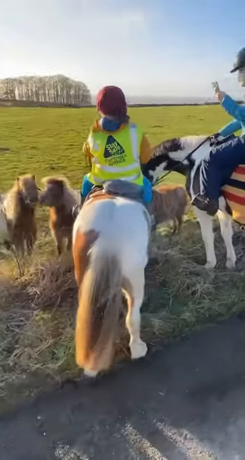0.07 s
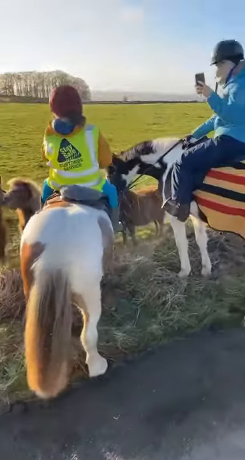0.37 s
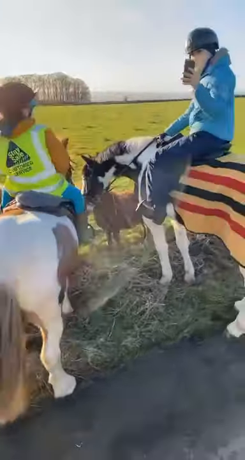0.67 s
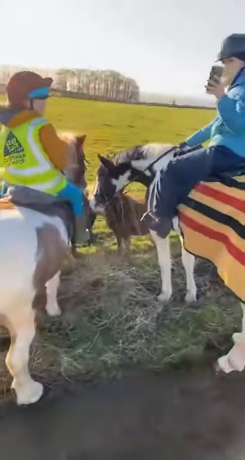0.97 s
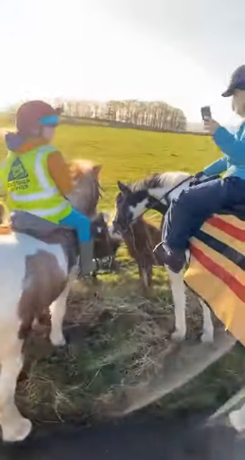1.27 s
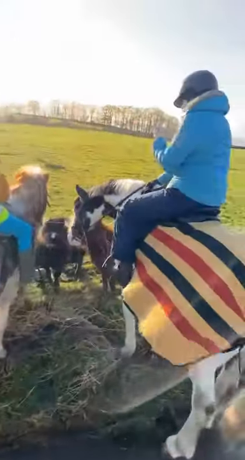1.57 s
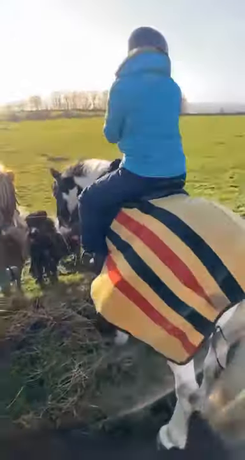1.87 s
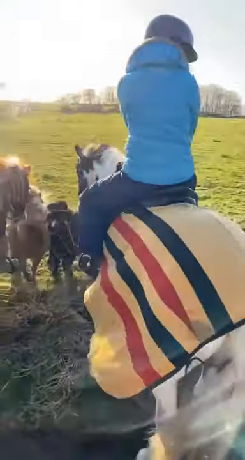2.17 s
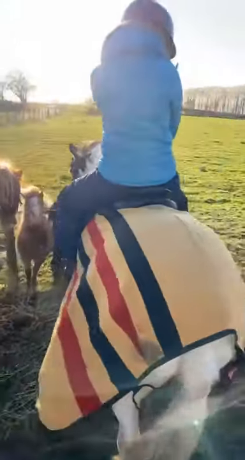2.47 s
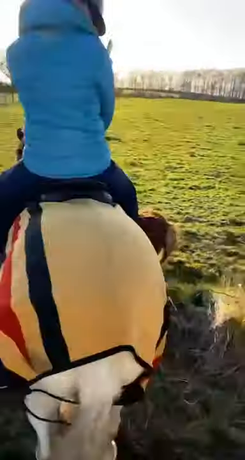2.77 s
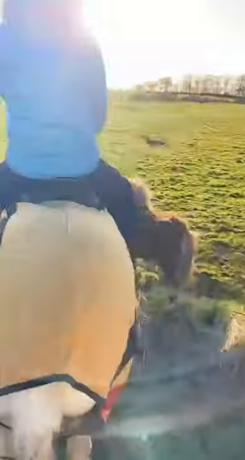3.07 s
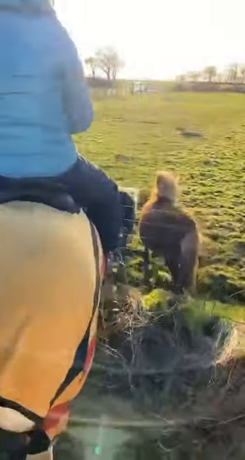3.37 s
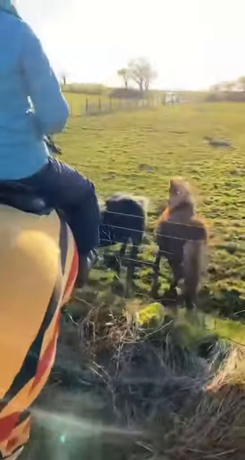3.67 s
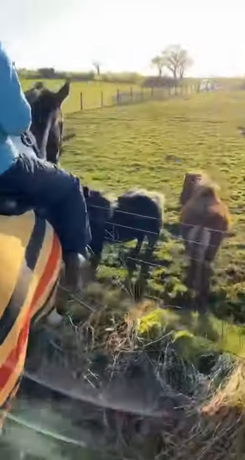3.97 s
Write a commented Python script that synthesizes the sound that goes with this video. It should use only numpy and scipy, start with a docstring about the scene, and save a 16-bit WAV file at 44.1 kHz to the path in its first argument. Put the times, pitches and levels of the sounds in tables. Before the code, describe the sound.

Wind rumbles and flutters on a microphone in an open field, easing near the end.

```python
"""Gusty wind buffets a small microphone in an open field.
Big eddies rumble on the port; small ones flutter, brighter the harder it blows.
Single eddies slap the membrane, and the hardest gusts tear into a rasp.
Faint behind: dry grass hissing, one thin chirp, rustles as of a coat. A limiter holds the peaks down."""
import sys
import numpy as np
from scipy import signal
from scipy.fft import rfft, irfft
from scipy.io import wavfile
from scipy.ndimage import uniform_filter1d, minimum_filter1d

SR = 44100
rng = np.random.default_rng(int(sys.argv[2]) if len(sys.argv) > 2 else 0)


def store_wav(level_fs):
    """Save 16-bit WAV to argv[1]."""
    pcm = np.round(np.clip(np.atleast_2d(level_fs), -1, 1) * 32767)
    wavfile.write(sys.argv[1], SR, pcm.T.astype(np.int16))


N = 176400
TIME_S = np.arange(N) / SR
BIN_HZ = np.maximum(np.arange(N // 2 + 1) * SR / N, 1)


def from_db(db):
    return 10 ** (np.asarray(db) / 20)


def rms(x):
    return np.sqrt(np.mean(x ** 2) + 1e-20)


def in_time(rows):
    """Interpolate a table at every sample."""
    return np.interp(TIME_S, *np.transpose(rows))


def at_hz(rows, hz):
    """Interpolate a table on a log-frequency axis."""
    known_hz, values = np.transpose(rows)
    return np.interp(np.log(hz), np.log(known_hz), values)


def drift(corner_hz):
    """Low-passed noise, rms 1."""
    slow = irfft(rfft(rng.standard_normal(N)) / (1 + (BIN_HZ / corner_hz) ** 2), N)
    return slow / rms(slow)


def coloured(x, spectrum):
    """Filter by a spectrum table, rms 1."""
    shaped = irfft(rfft(x) * from_db(at_hz(spectrum, BIN_HZ)), N)
    return shaped / rms(shaped)


def steadied(x, strength=0.72, window_s=0.11):
    """Partly even out slow swells, rms 1."""
    power = uniform_filter1d(x ** 2, int(window_s * SR))
    power = uniform_filter1d(power, int(window_s * SR / 2))
    even = x / (power + 1e-9) ** (strength / 2)
    return even / rms(even)


def swell(start_s, length_s):
    """Half-sine envelope."""
    return np.sin(np.pi * np.clip((TIME_S - start_s) / length_s, 0, 1))


def pressure_grain(pops_per_s=1600, spread_db=2.5, noise_gain=0.6):
    """Tiny pressure jumps of uneven size over a little smooth noise."""
    sizes = from_db(spread_db * np.minimum(rng.exponential(1, N), 3))
    signs = rng.choice([-1, 1], N)
    pops = sizes * signs * (rng.random(N) < pops_per_s / SR)
    return pops / rms(pops) + noise_gain * rng.standard_normal(N)


# Push of the big eddies. Each row: time in seconds, relative level in dB.
EDDY_PUSH = [(0.0, -19.5), (0.155, -10.5), (0.289, -18.5), (0.334, -10), (0.654, -15), (0.718, -33),
             (0.753, -15), (0.833, -12), (0.853, -22.5), (1.028, -3), (1.048, -13), (1.507, -13),
             (1.956, -17.5), (1.976, -12), (2.235, -11.5), (2.245, -12.5), (2.295, -22.5), (2.335, -7.5),
             (2.365, -18.5), (2.449, -10), (2.529, -17), (3.048, -14.5), (3.118, -18.5), (3.153, -12),
             (3.397, -26), (3.717, -21.5), (3.771, -22.5), (3.801, -41), (3.941, -41.5), (3.991, -31)]
# Each row: frequency in Hz, relative level in dB.
RUMBLE_SPECTRUM = [(15, -20.5), (30, -14), (52, -2.5), (63, 0), (75, 4.5), (90, -1.5), (120, 0),
                   (200, -7.5), (350, -19.5), (700, -49), (1500, -83)]


def rumble(gain_db=1.5):
    """Big eddies rock the membrane in slow lumps."""
    lumps = steadied(coloured(rng.standard_normal(N), RUMBLE_SPECTRUM))
    return from_db(gain_db + in_time(EDDY_PUSH)) * lumps


# Airflow force on the port. Each row: time in seconds, relative level in dB.
AIRFLOW_FORCE = [(0.0, -38.5), (0.075, -43.5), (0.125, -13.5), (0.185, -34.5), (0.21, -20), (0.244, -26.5),
                 (0.289, -36.5), (0.329, -9), (0.379, -6.5), (0.399, -23.5), (0.469, -9), (0.489, -31),
                 (0.504, -22.5), (0.529, -38), (0.569, -22), (0.614, -33.5), (0.629, -16), (0.659, -25),
                 (0.673, -33), (0.723, -52), (0.748, -20.5), (0.823, -29.5), (0.843, -41.5), (0.933, -37.5),
                 (0.983, -23.5), (1.053, -1), (1.098, -23), (1.117, -15.5), (1.167, -24.5), (1.287, -10.5),
                 (1.317, -24.5), (1.337, -16), (1.397, -25), (1.417, -12.9), (1.512, -10), (1.646, -40),
                 (1.671, -24.5), (1.761, -18.5), (1.866, -22), (1.891, -19), (1.941, -45), (1.98, -35.5),
                 (2.04, -23), (2.06, -35.5), (2.085, -21.5), (2.18, -23.5), (2.205, -34), (2.23, -17),
                 (2.285, -26.5), (2.355, -22), (2.38, -27), (2.484, -18.5), (2.549, -26.5), (2.579, -18.5),
                 (2.724, -29), (2.784, -29.5), (2.918, -20.5), (3.198, -20.5), (3.332, -35.5), (3.467, -36),
                 (3.512, -54), (3.542, -33.8), (3.587, -37), (3.607, -28), (3.622, -43), (3.642, -45),
                 (3.662, -22.5), (3.727, -24.5), (3.776, -38.5), (3.791, -53), (3.891, -79), (3.991, -63)]
# Unevenness of the puffs. Each row: time in seconds, spread in dB before steadying.
PUFF_SPREAD = [(0, 4), (2.3, 4.5), (2.8, 1.1), (3.2, 2.5), (3.45, 5), (4, 2.5)]
# Each row: frequency in Hz, relative level in dB.
FLUTTER_SPECTRUM = [(60, -20.5), (150, 5.5), (350, 5.5), (700, -2), (1200, -11), (2000, -25), (3000, -39.5),
                    (4500, -58.5), (8000, -78)]
# Flutter growth with force. Each row: frequency in Hz, slope in dB per dB.
FLUTTER_GROWTH = [(150, 0.82), (500, 0.94), (1200, 1.14), (2500, 1.68), (5000, 1.84)]


def flutter(gain_db=-14, usual_force_db=-20):
    """Small eddies break on the port in quick puffs; high octaves grow fastest with force."""
    puffs = from_db(in_time(PUFF_SPREAD) * drift(corner_hz=60))
    drive = from_db(in_time(AIRFLOW_FORCE) - usual_force_db) * steadied(puffs)
    air_bins = rfft(steadied(coloured(pressure_grain(), FLUTTER_SPECTRUM)))
    octaves_hz = np.geomspace(125, 8000, 7)
    out = np.zeros(N)
    for hz, selector in zip(octaves_hz, np.eye(len(octaves_hz))):
        band_weights = np.interp(np.log(BIN_HZ), np.log(octaves_hz), selector)
        band = irfft(air_bins * band_weights, N)
        out += band * drive ** at_hz(FLUTTER_GROWTH, hz)
    return from_db(gain_db) * out


# Each row: frequency in Hz, relative level in dB.
GRASS_SPECTRUM = [(300, 4), (1000, 10), (2500, 5.5), (4200, 3), (5500, -1.5), (8500, -8.5)]


def grass(level_db=-62.5):
    """Wind hisses steadily in dry grass."""
    return from_db(level_db) * coloured(rng.standard_normal(N), GRASS_SPECTRUM)


# Single eddies hitting the port. Each row: start in seconds, relative attack level in dB.
EDDY_SLAPS = [(0.114, -8.5), (0.127, -25.5), (0.205, -27.5), (0.212, -26), (0.379, 12.5), (0.457, -15),
              (0.466, -15), (0.499, -14), (0.588, -10), (0.624, -36), (0.651, -30), (0.755, -21),
              (0.958, -4), (0.986, 6.5), (1.015, 14), (1.113, 2), (1.232, 13), (1.338, -2), (1.419, -3.5),
              (1.543, 6), (1.749, 6.5), (1.787, -7), (1.881, 13), (1.976, -8.5), (2.008, -10.5),
              (2.079, -9), (2.1, -10), (2.164, -10), (2.179, -9.5), (2.227, -3), (2.265, -12.5),
              (2.343, -8.5), (2.465, -8), (2.628, -13), (2.705, -24)]


def slaps(gain_db=-9, decay_s=0.0025, attack_s=0.004, lag_s=0.001, tail_noise=0.46):
    """Each slap is a pressure jump with a short torn tail, dulled by the port."""
    out, t = np.zeros(N + SR), TIME_S[:SR // 20]
    port = np.vstack([signal.butter(2, 536, "high", fs=SR, output="sos"),
                      signal.butter(3, 1592, "low", fs=SR, output="sos"),
                      signal.butter(2, 3600, "low", fs=SR, output="sos")])
    for start_s, level_db in EDDY_SLAPS:
        jump = rng.choice([-1, 1]) + tail_noise * rng.standard_normal(len(t))
        slap = signal.sosfilt(port, jump * np.exp(-t / decay_s))
        start = int((start_s + lag_s) * SR)
        out[start:start + len(t)] += from_db(level_db + gain_db) * slap / rms(slap[t < attack_s])
    return out[:N]


def chirp(start_s=0.22, length_s=0.09, start_hz=7000, end_hz=6100, waver_hz=220, peak_db=-62):
    """One thin falling note, likely a far bird."""
    glide_hz = np.interp(TIME_S, [start_s, start_s + length_s], [start_hz, end_hz])
    pitch_hz = glide_hz + waver_hz * drift(corner_hz=200)
    tone = np.sin(2 * np.pi * np.cumsum(pitch_hz) / SR)
    return from_db(peak_db) * swell(start_s, length_s) * tone


# Gusts tearing at the port. Each row: start in seconds, length in seconds, relative level in dB.
GUST_TEARS = [(0.301, 0.089, -44), (0.983, 0.1, -40.5), (1.027, 0.059, -32), (1.216, 0.09, -37.5),
              (1.415, 0.134, -27.5), (1.71, 0.047, -38.5)]
# Each row: frequency in Hz, relative level in dB.
RASP_SPECTRUM = [(500, -30), (1500, 7.5), (2500, 1), (3500, -10), (5000, -21), (6500, -31.5), (8500, -49.5)]


def tears(gain_db=5.5, edge_s=0.022, crackle_db=4.5):
    """In the hardest gusts the flow rips into a crackling rasp."""
    gates = sum(from_db(level_db) * ((TIME_S > start_s) & (TIME_S < start_s + length_s))
                for start_s, length_s, level_db in GUST_TEARS)
    envelope = uniform_filter1d(gates, int(edge_s * SR))
    crackle = steadied(pressure_grain() * from_db(crackle_db * drift(corner_hz=100)))
    return from_db(gain_db) * envelope * coloured(crackle, RASP_SPECTRUM)


# Cloth swishes. Each row: centre in seconds, length in seconds, level in dB.
CLOTH_SWISHES = [(.675, 0.15, -58.5), (2.746, 0.15, -59), (3.06, .14, -54), (3.272, 0.31, -56),
                 (3.504, 0.057, -53), (3.72, .12, -65), (3.87, 0.046, -60)]
# Each row: frequency in Hz, relative level in dB.
CLOTH_SPECTRUM = [(800, 0), (2800, 1.5), (4200, -1.5), (5500, -6.5), (8500, -12.5)]


def rustles():
    """Cloth rubs softly near the microphone."""
    rubbing = sum(from_db(level_db) * swell(centre_s - length_s / 2, length_s)
                  for centre_s, length_s, level_db in CLOTH_SWISHES)
    return rubbing * coloured(rng.standard_normal(N), CLOTH_SPECTRUM)


def limiter_gain(x, ceiling_db=-0.3, release_db_per_s=1001):
    """Gain dips just ahead of each peak over the ceiling and recovers fast."""
    over_db = np.maximum(20 * np.log10(np.abs(x) + 1e-9) - ceiling_db, 0)
    release_db = release_db_per_s * TIME_S
    reduction_db = np.maximum.accumulate(over_db + release_db) - release_db
    look_ahead = minimum_filter1d(from_db(-reduction_db), size=128)
    return uniform_filter1d(uniform_filter1d(look_ahead, size=64), size=64)


def scene():
    """Wind on the port over the small sounds of the field, mono."""
    return (rumble() + flutter() + grass() + slaps() + chirp() + tears() + rustles())[None]


def record(dry):
    """Limiter, short fade-in, steep low-pass."""
    fade_s, cutoff_hz = 0.004, 9000
    gain = limiter_gain(dry[0]) * np.minimum(TIME_S / fade_s, 1)
    low_pass = signal.ellip(8, 0.2, 70, cutoff_hz, fs=SR, output="sos")
    return signal.sosfilt(low_pass, dry * gain)


dry = scene()
out = record(dry)
store_wav(out)
```